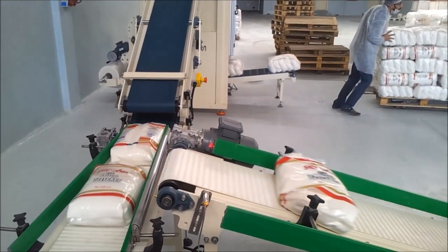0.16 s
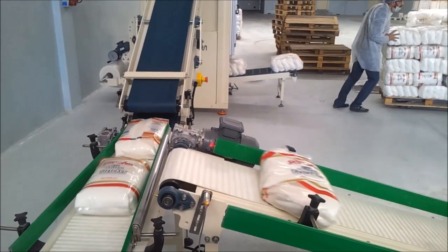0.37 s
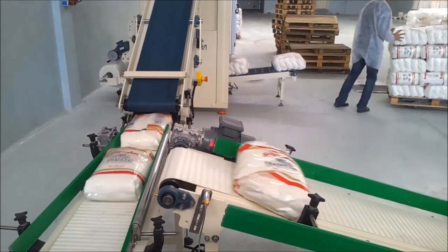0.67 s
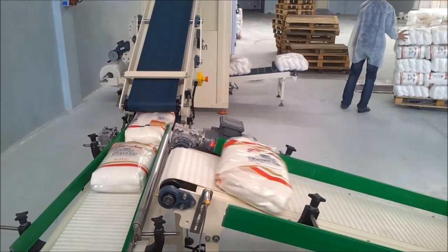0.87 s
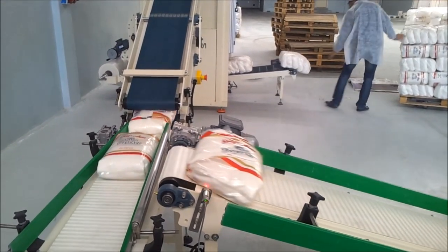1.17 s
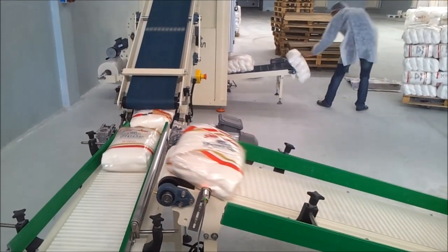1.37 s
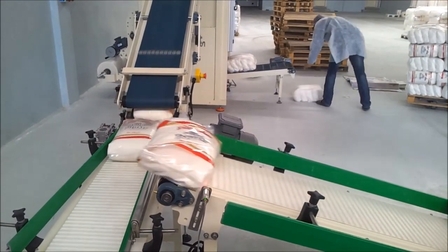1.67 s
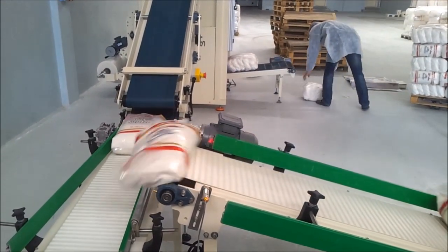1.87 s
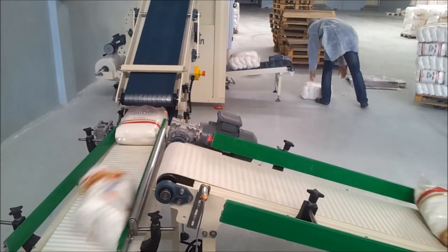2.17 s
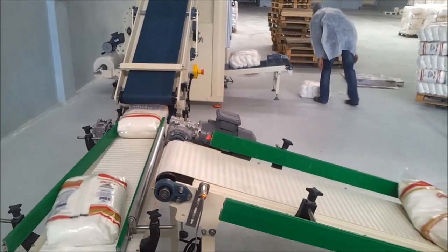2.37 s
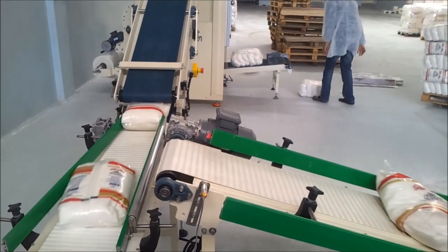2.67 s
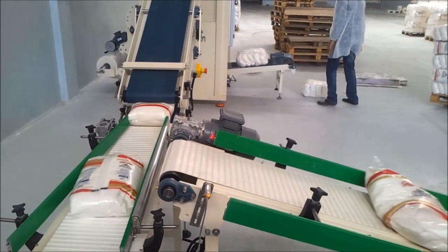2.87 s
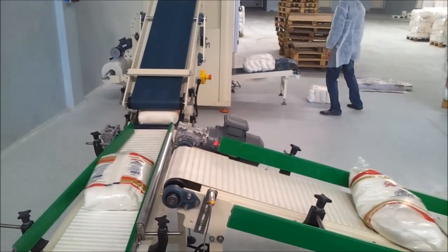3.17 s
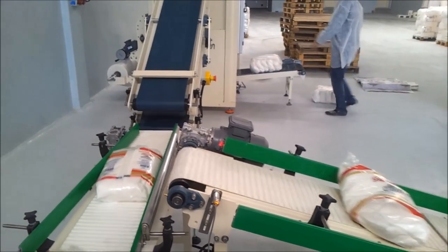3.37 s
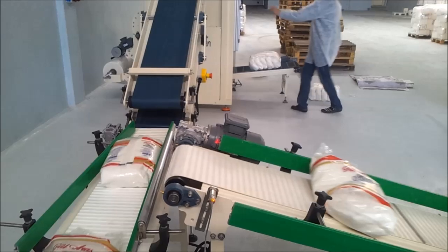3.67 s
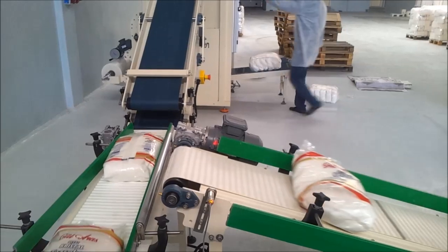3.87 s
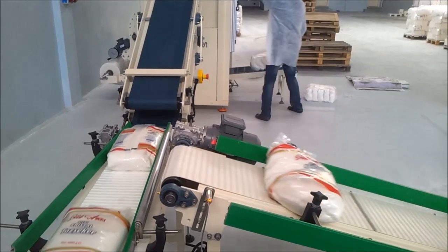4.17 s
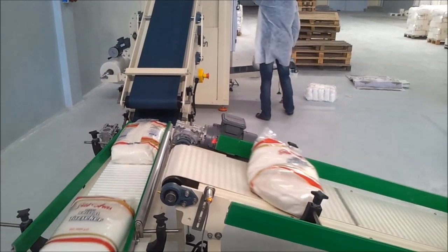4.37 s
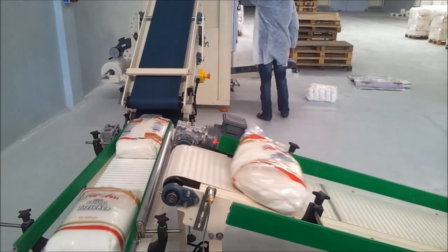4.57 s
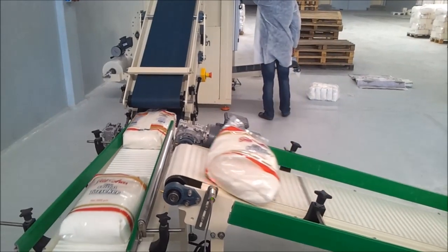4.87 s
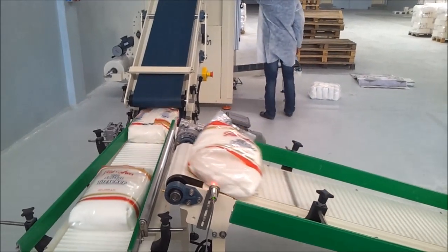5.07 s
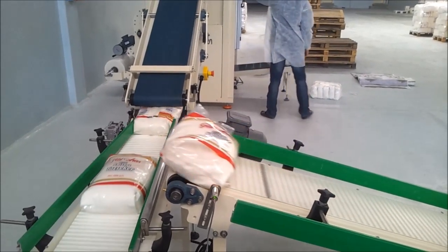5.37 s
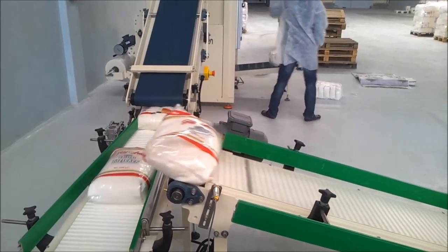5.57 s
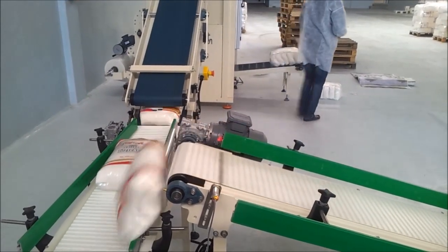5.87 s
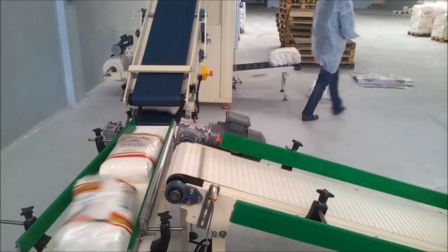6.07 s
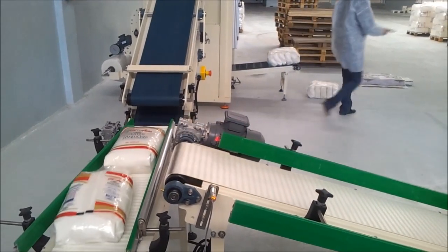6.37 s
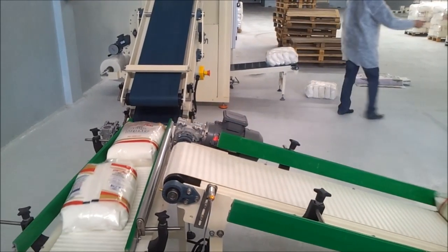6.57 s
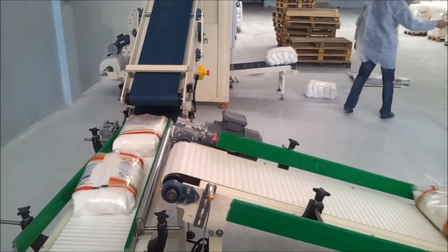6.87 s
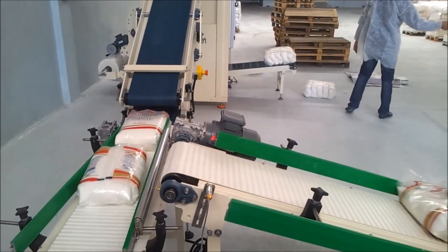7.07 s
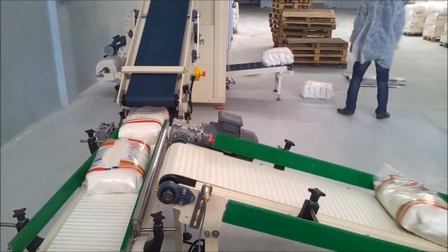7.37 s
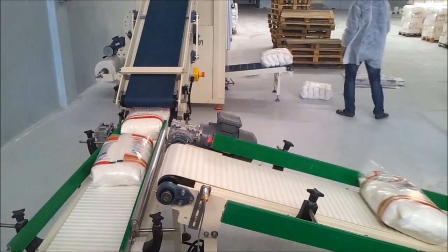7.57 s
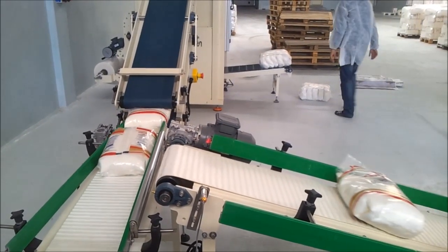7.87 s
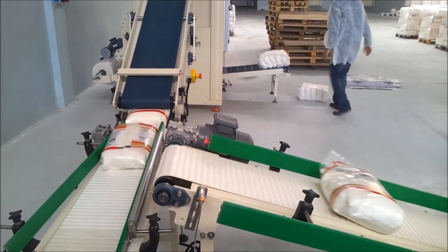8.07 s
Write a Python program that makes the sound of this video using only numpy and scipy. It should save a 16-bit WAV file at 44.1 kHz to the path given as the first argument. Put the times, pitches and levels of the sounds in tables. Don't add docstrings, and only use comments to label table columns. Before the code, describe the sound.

A bagging line runs in a large hall: low motor rumble, clattering belt links, faint wavering whine and a quick ten-per-second grainy rustle. A bag thumps early, short air jets hiss, a flap slams near two seconds, then knocks, strong valve puffs and long air jets follow. Another thump and a second slam come later. Stereo microphones stand close to the machinery, with short hall reverberation.

```python
import sys
import numpy as np
from scipy import signal
from scipy.fft import rfft, irfft, next_fast_len
from scipy.io import wavfile

SR = 44100
rng = np.random.default_rng(int(sys.argv[2]) if len(sys.argv) > 2 else 0)


def dump(signal):
    limited = np.clip(np.atleast_2d(signal).T, -1, 1)
    pcm = np.round(limited * 32767).astype(np.int16)
    wavfile.write(sys.argv[1], SR, pcm)


def linear_from_db(decibels):
    return 10 ** (np.asarray(decibels, float) / 20)


N = 362502
T = np.arange(N) / SR
HZ = np.maximum(np.fft.rfftfreq(next_fast_len(N), 1 / SR), 1)


def rms_one(x):
    return x / np.sqrt(np.mean(x ** 2) + 1e-20)


def in_time(rows):
    s, *columns = np.transpose(rows)
    return [np.interp(T, s, c) for c in columns]


def at_hz(points, hz):
    f, *columns = np.transpose(points)
    return [np.interp(np.log(hz), np.log(f), c) for c in columns]


def shaped(x, gain):
    size = next_fast_len(N)
    return irfft(rfft(x, size) * gain, size)[..., :N]


def drift(rate_hz):
    r = np.exp(-80 * np.pi * rate_hz / SR)
    slow = signal.lfilter([1], [1, -2 * r, r * r], rng.standard_normal(N // 40 + 2002))[2000:]
    return np.interp(np.arange(N) / 40, np.arange(len(slow)), rms_one(slow))


def resonate(x, hz, width_hz):
    r = np.exp(-np.pi * width_hz / SR)
    zeros = np.array([1, 0, -1]) * (1 - r * r) / 2
    return signal.lfilter(zeros, [1, -2 * r * np.cos(2 * np.pi * hz / SR), r * r], x)


def hiss(colour):
    return rms_one(shaped(rng.standard_normal((2, N)), linear_from_db(at_hz(colour, HZ)[0])))


def patchy(x, low_hz, flicker_db, rate_hz):
    out, together = 0, drift(rate_hz / 2)
    for centre_hz in low_hz * 2. ** np.arange(-1, 6):
        octave = np.cos(np.pi / 2 * np.clip(np.log2(HZ / centre_hz), -1, 1)) ** 2
        out = out + shaped(x, octave) * linear_from_db(flicker_db * (0.6 * together + drift(rate_hz)))
    return rms_one(out)


def burst(start_s, rise_s, t60_s, size=N):
    t = np.maximum(T[:size] - start_s, 0)
    return (1 - np.exp(-t / max(rise_s, 1e-4))) * linear_from_db(-60 * np.minimum(t / t60_s, 3))


def gate(start_s, length_s, attack_s, release_s):
    t = T - start_s
    opened = np.clip(np.minimum(t / attack_s, 1 - (t - length_s) / release_s), 0, 1)
    return opened, np.clip(t / length_s, 0, 1)


def swells(rows, rise_db_per_s, fall_db_per_s, rest_db):
    s, db = np.transpose(rows)[:, :, None]
    t = T[::100]
    below_db = np.maximum(rise_db_per_s * (s - t), fall_db_per_s * (t - s))
    return np.interp(T, t, np.maximum(np.max(db - below_db, axis=0), rest_db))


def taps(rows):
    out, t = np.zeros(N + SR), T[:SR // 4]
    for s, db, hz, t60_s in rows:
        out[round(s * SR):][:len(t)] += linear_from_db(db - 60 * t / t60_s) * np.sin(2 * np.pi * hz * t)
    return out[:N] * np.ones((2, 1))


def hall(x):
    t60_s, tail_db = 0.24, -13
    tail = rng.standard_normal((2, SR)) * burst(0.0032, 0.0079, t60_s, SR)
    tail = tail / np.sqrt(np.sum(tail ** 2, axis=1, keepdims=True))
    return x + linear_from_db(tail_db) * signal.fftconvolve(x * np.ones((2, 1)), tail, axes=1)[:, :N]


# pitch_hz, likeness [0-1], left_over_right_db
MIC_PAIR = [(60, 0.8, 11), (200, 0.87, 6), (497, 0.79, 3), (790, 0.53, 1.5), (1200, 0.3, 0.5),
            (1690, 0.16, 1), (2200, 0, -1), (3600, 0, -.5), (4960, 0, -5), (7960, 0, 5), (11200, 0, 5.5),
            (14500, 0, 11.5)]
# pitch_hz, lead_rad
LEFT_LEAD = [(60, 2.9), (300, 2.4), (700, 2.4), (1100, 1.4), (1700, -.3), (2500, -1.3), (4000, -3),
             (7000, -9.3), (10000, -16), (14500, -26)]


def pair(x, pan_db=0, direct=0):
    alike, balance_db = at_hz(MIC_PAIR, HZ)
    alike = np.clip(alike + direct, 0, 1)
    left = shaped(x[0], linear_from_db((balance_db + pan_db) / 2))
    right = shaped(x[0], alike * np.exp(-1j * at_hz(LEFT_LEAD, HZ)[0]))
    right = right + shaped(x[1], np.sqrt(1 - alike ** 2))
    return np.array([left, shaped(right, linear_from_db(-(balance_db + pan_db) / 2))])


# top_s, level_db
BASS_LUMPS = [(0, -36), (.14, -36), (.27, -31), (.68, -40), (.91, -38), (1.08, -45), (1.21, -42),
              (1.72, -38), (1.9, -34), (2.08, -35), (2.45, -41), (2.58, -39), (2.84, -34), (3.0, -40),
              (3.26, -35), (3.41, -43), (3.53, -41), (3.69, -42), (4.12, -50), (4.33, -44), (4.84, -41),
              (5.0, -40), (5.1, -43), (5.21, -40), (5.39, -31), (5.5, -46), (5.7, -49), (6.23, -42),
              (6.52, -45), (7.03, -31.5), (7.38, -41), (7.9, -52)]


def lumpy_bass():
    colour = [(20, -19), (50, -24), (85, -10.5), (140, 3.5), (190, -5.0), (260, -23.0)]
    level_db = swells(BASS_LUMPS, rise_db_per_s=170, fall_db_per_s=194, rest_db=-75)
    return linear_from_db(level_db + 1.0 + 0.52 * drift(16.0)) * hiss(colour)


# time_s, motors_db, links_db
DRIVE_LEVEL = [(0, -22.5, -21.5), (.45, -26.5, -19), (.98, -21, -20), (1.4, -26, -20), (1.75, -23, -19),
               (2.38, -24.5, -20), (2.7, -23, -19.5), (3.35, -24, -23), (3.6, -24.5, -19),
               (4.0, -26.5, -20.5), (4.4, -25, -19.5), (4.8, -27.5, -20.5), (5.2, -25, -21), (5.7, -23, -22),
               (6.2, -28, -21.5), (6.85, -24.5, -24), (7.8, -27.5, -24), (8.22, -25.5, -25)]
# pitch_hz, level_db [per Hz]
RUMBLE_COLOUR = [(100, -51), (170, -16.5), (302, -8), (353, -7), (457, -6.5), (541, -5.5), (656, -4),
                 (776, -7), (868, -14.5), (1910, -8), (2500, -18.5), (3250, -62), (5500, -120)]
# pitch_hz, width_hz, level_db
FRAME_MODES = [(244, 110, -18), (355, 49, -11), (550, 57, -4), (745, 65, -4.5)]
# pitch_hz, level_db [per Hz]
CLATTER_COLOUR = [(530, -20.5), (900, -8.5), (1520, -8), (1700, -5), (1870, -9.5), (2190, -10.5),
                  (2430, -11), (2670, -8), (5280, -16), (8290, -15), (11000, -18.5), (14300, -37),
                  (22000, -120)]
# pitch_hz, level_db [per Hz]
SIZZLE_COLOUR = [(6000, -35), (9000, -2), (11000, -2), (13000, 2), (15000, -10)]
# start_s, length_s, loss_db, change_db
SIZZLE_DIPS = [
    (1.15, .85, 7, -1),
    (2.3, .35, 8, 0),
    (3.2, .6, 12, -3),
    (6.3, 2, 5, 2),
]


def drives():
    rumble_db, clatter_db = in_time(DRIVE_LEVEL)
    sizzle_db = -25
    for s, length_s, loss_db, change_db in SIZZLE_DIPS:
        dipped, passed = gate(s, length_s, .1, 0.087)
        sizzle_db = sizzle_db - dipped * (loss_db + change_db * passed)

    white = rng.standard_normal((2, N))
    frame = 0
    for hz, width_hz, db in FRAME_MODES:
        frame = frame + linear_from_db(db) * rms_one(resonate(white, hz, width_hz)) * linear_from_db(1.9 * drift(5.2))
    rumble = patchy(hiss(RUMBLE_COLOUR), low_hz=162, flicker_db=1.5, rate_hz=16) + linear_from_db(-6) * frame

    links = rng.standard_normal((2, N)) * linear_from_db(2.0 * np.minimum(rng.exponential(1, N), 5))
    links = shaped(links, linear_from_db(at_hz(CLATTER_COLOUR, HZ)[0]))
    clatter = patchy(links, low_hz=606, flicker_db=0.7, rate_hz=6.9)
    sizzle = linear_from_db(sizzle_db - 8.5 + 2.5 * drift(13.0)) * hiss(SIZZLE_COLOUR)
    return linear_from_db(rumble_db + 4) * rumble + linear_from_db(clatter_db + 2.5) * clatter + sizzle


# time_s, centre_hz, level_db
BELT_RUB = [(0, 3470, -36), (1.5, 3460, -38), (1.65, 3510, -25), (2.1, 3580, -33), (2.45, 3400, -25),
            (2.75, 3480, -29), (3.2, 3530, -32), (3.7, 3490, -35), (4.6, 3400, -36), (4.75, 3450, -23),
            (5.0, 3430, -40), (6.0, 3490, -41), (6.3, 3490, -45), (7.1, 3400, -36), (7.3, 3360, -28),
            (7.65, 3400, -24), (7.85, 3370, -35), (8.22, 3550, -31)]


def rubbing():
    hz, level_db = in_time(BELT_RUB)
    lowpass = signal.butter(2, 210, fs=SR, output="sos")
    sway = signal.sosfilt(lowpass, rng.standard_normal((2, 2, N)))
    phase = 2 * np.pi * np.cumsum(hz + 60 * drift(7.9)) / SR
    band = rms_one(sway[0] * np.cos(phase) + sway[1] * np.sin(phase))
    return linear_from_db(level_db + 2.0 * drift(12)) * band


def glide(rows):
    hz, level_db = in_time(rows)
    tone = np.sin(2 * np.pi * np.cumsum(hz + 5.0 * drift(20)) / SR)
    return tone * linear_from_db(level_db + 1.5 * drift(15)) * (T < rows[-1][0])


SHAKER_FIRST_S, SHAKER_PERIOD_S = .045, .09688
# time_s, level_db
WHINE_LOAD = [(0, -30), (.55, -33), (.95, -31), (1.06, -28), (1.13, -27), (1.17, -22), (1.33, -24.5),
              (1.45, -33), (2.1, -31), (2.42, -28), (2.95, -31), (3.4, -26), (3.9, -34), (4.75, -38),
              (4.96, -27), (5.1, -25), (5.4, -24.5), (5.5, -33), (5.6, -25), (5.78, -24), (5.87, -31),
              (5.93, -33), (6.4, -39), (6.48, -28), (6.95, -32), (7.1, -50)]
# pitch_hz, width_hz, level_db
GEAR_BANDS = [(1755, 57, -5), (1650, 35, 3), (1890, 40, -14), (3400, 61, 2)]
# time_s, pitch_hz
MESH_PITCH = [(0, 1757), (.9, 1750), (1.05, 1722), (1.2, 1748), (1.32, 1765), (1.6, 1759), (4.9, 1755),
              (5.9, 1757), (6.5, 1760), (8.22, 1760)]
# time_s, pitch_hz, level_db
SLOWING_DRIVE = [(0, 985, -25), (.1, 990, -25), (.28, 980, -27), (.5, 1003, -25), (.7, 1003, -26),
                 (.8, 985, -28), (.88, 975, -50)]
# time_s, pitch_hz, level_db
COASTING_DRIVE = [(0, 955, -23), (.12, 945, -25), (.33, 930, -27), (.45, 930, -36), (.95, 925, -38),
                  (1.08, 940, -28), (1.3, 922, -27), (1.45, 912, -26), (1.55, 910, -50)]


def whine():
    white = rng.standard_normal(N)
    mesh = 0
    for hz, width_hz, db in GEAR_BANDS:
        mesh = mesh + linear_from_db(db) * rms_one(resonate(resonate(white, hz, width_hz), hz, width_hz))
    throb = np.cos(2 * np.pi * ((T - SHAKER_FIRST_S) / SHAKER_PERIOD_S - 0.05))
    tone_hz = in_time(MESH_PITCH)[0] + 4.0 * drift(9)
    tone = np.sin(2 * np.pi * np.cumsum(tone_hz) / SR)
    mesh = mesh + linear_from_db(9.0 + 3.5 * throb + 1.0 * drift(8)) * tone
    level_db = in_time(WHINE_LOAD)[0] - 10.5 + 1 * throb
    return linear_from_db(level_db) * mesh + glide(SLOWING_DRIVE) + glide(COASTING_DRIVE)


# time_s, level_db
SHAKER_STROKE = [(0, -26), (.6, -23), (1.2, -25.5), (1.7, -26), (2.1, -29), (2.67, -26), (2.78, -26),
                 (3.0, -25), (3.15, -22), (3.28, -20.5), (3.4, -28), (5.0, -26), (5.1, -20.5), (5.22, -24),
                 (5.4, -24), (5.7, -21.5), (8.22, -25)]
# pitch_hz, level_db [per Hz]
RUSTLE_COLOUR = [(2500, -11), (4000, 0.5), (5500, -9.5), (7000, 1.5), (8500, 2), (10000, 0.5),
                 (11500, -8.5), (14000, -26)]


def shaker():
    since_s = (T - SHAKER_FIRST_S) % SHAKER_PERIOD_S
    stroke = ((T - SHAKER_FIRST_S) // SHAKER_PERIOD_S + 1).astype(int)
    strength = linear_from_db(1.3 * rng.standard_normal(stroke.max() + 1))[stroke]
    throw = rms_one((1 - np.exp(-since_s / 0.0066)) ** 2 * np.exp(-since_s / 0.059))
    grains = linear_from_db(1.4 * np.minimum(rng.exponential(1, N), 5))
    rustle = rms_one(hiss(RUSTLE_COLOUR) * grains)
    return linear_from_db(in_time(SHAKER_STROKE)[0]) * strength * throw * rustle


# time_s, snaps_per_s
SNAP_RATE = [(0, 5), (1.9, 8), (2.1, 50), (2.3, 70), (2.6, 15), (5.7, 8), (6.0, 40), (6.3, 10), (8.22, 8)]


def crackle():
    snaps = rng.random(N) < in_time(SNAP_RATE)[0] / SR
    snaps = snaps * linear_from_db(-13 + 1.8 * rng.standard_normal(N))
    return 3.5 * (resonate(snaps, 3700, 2200) - 0.39 * resonate(snaps, 1900, 900)) * np.ones((2, 1))


def rattles(rows, width_share):
    out, size = np.zeros((2, N)), SR // 3
    white = rng.standard_normal((len(rows), 2, size))
    touch = linear_from_db(-7) * burst(0, .0002, .008, size)
    for rattle, (s, db, hz, t60_s) in zip(white, rows):
        i = round(s * SR)
        envelope = burst(0, 0.00034, t60_s, size) + touch
        sound = linear_from_db(db) * rms_one(resonate(rattle, hz, width_share * hz)) * envelope
        out[:, i:i + size] += sound[:, :N - i]
    return out


# start_s, level_db, pitch_hz, t60_s
HOLLOW_KNOCKS = [(.537, -18, 1400, 0.25), (.545, -17, 1840, 0.33), (.78, -18, 750, 0.22),
                 (1.525, -17, 1580, 0.35), (1.714, -15, 1750, .12), (1.52, -17, 1900, .2),
                 (1.525, -19, 2100, .15), (.537, -17, 1700, .2), (3.35, -17, 4000, .12),
                 (3.3, -17, 3400, .15), (1.714, -15, 1500, .1), (.572, -15, 1000, 0.11),
                 (.572, -18, 1480, .12), (.574, -19, 1900, 0.14), (.385, -18, 1700, .12),
                 (.905, -14, 1880, .1), (3.298, -13, 1450, .12), (3.305, -17, 1750, .1),
                 (3.335, -14, 3500, .14), (3.335, -16, 1350, .2), (3.405, -16, 1550, 0.22),
                 (3.51, -16, 1300, .12), (3.3, -22, 1700, .1), (3.675, -18, 1600, .08),
                 (2.749, -14, 687, .1), (4.883, -12.5, 930, 0.13), (4.884, -16, 1150, 0.25),
                 (5.699, -16, 680, .15), (6.17, -21, 3450, .15), (8.068, -13, 510, 0.17)]
# start_s, level_db, pitch_hz, t60_s
DRY_TICKS = [(1.625, -14, 1400, .18), (2.843, -15, 3500, 0.3), (2.064, -16, 4000, .12),
             (2.201, -16, 3240, .15), (2.29, -14, 4500, 0.035), (2.324, -21, 3800, .04),
             (2.931, -10, 550, 0.18), (2.934, -15, 3500, 0.13), (2.971, -12, 3200, .018),
             (3.0185, -13, 1910, 0.051), (3.43, -16, 1300, 0.11), (6.249, -10.5, 550, 0.15),
             (8.125, -14, 1100, 0.071), (8.16, -12, 2500, .1)]
# start_s, peak_db, pitch_hz, t60_s
HARD_TAPS = [(.097, -15, 1800, .02), (.186, -7, 1800, .02), (2.666, -15, 7500, .01),
             (2.9712, -11, 7990, .006), (2.9712, -11, 6000, .006), (3.0195, -13, 7500, .008),
             (3.0195, -13, 9500, .006), (1.8715, -10, 2300, .03), (2.0632, -12, 4000, .015),
             (2.2014, -11, 3900, 0.0088), (2.291, -9, 4600, .01), (2.3236, -17, 3000, .012),
             (2.799, -14, 1800, .03), (2.843, -13, 3000, .015), (2.931, -14, 1800, .03),
             (2.952, -16, 1700, .04), (2.9712, -12, 2050, .03), (2.9712, -10, 4000, .012),
             (2.980, -15, 1510, 0.022), (3.0182, -5, 1620, 0.016), (3.0182, -9, 2600, .012),
             (3.0195, -9, 4770, 0.011), (3.0215, -12, 3100, .02), (3.0235, -13, 2100, 0.031),
             (8.0700, -12, 550, .07), (8.083, -15, 620, 0.049), (8.083, -13, 3480, .03),
             (8.108, -15, 3600, .04), (8.1185, -10, 1790, 0.022), (8.1185, -9, 3000, .015),
             (8.1572, -14, 1800, .018), (8.159, -18, 4250, .015)]
# start_s, peak_db, pitch_hz, t60_s
GUARD_RINGS = [(.537, -16, 1301, .16), (.537, -18, 1120, .09), (.545, -16, 1935, .2),
               (.545, -16, 1750, .12), (.775, -14.5, 752, .2), (1.522, -16, 1607, .2),
               (1.525, -18, 1410, .16), (4.883, -23, 946, 0.12), (6.249, -20, 995, 0.11),
               (1.16, -19, 1570, .12), (5.41, -19, 1696, .12), (6.16, -21, 1870, .1),
               (6.21, -19, 1640, 0.13), (1.63, -29, 1430, .12)]


def contacts():
    return rattles(HOLLOW_KNOCKS, 0.2) + rattles(DRY_TICKS, 0.54) + taps(HARD_TAPS + GUARD_RINGS)


# start_s, peak_db, pitch_hz, length_s
BAG_THUMPS = [
    (0.251, 1.5, 357, 0.022),
    (5.38, 1, 355, 0.022),
    (5.431, -13, 350, .015),
]
# start_s, level_db, pitch_hz, length_s
INDEX_HUMS = [
    (0.02, -25, 236, .2),
    (.98, -21.5, 236, .2),
    (1.98, -22, 236, .22),
]


def thumps():
    out = np.zeros(N)
    for s, db, hz, length_s in BAG_THUMPS + INDEX_HUMS:
        t = T[:round(length_s * SR)]
        envelope = linear_from_db(db - 7 * t / length_s) * np.abs(np.sin(np.pi * t / length_s)) ** 0.14
        out[round(s * SR):][:len(t)] += envelope * np.sin(2 * np.pi * hz * t)
    return out


# start_s, level_db
FLAP_CLACKS = [
    (1.885, -1.5),
    (7.0234, -3),
    (2.1, -16),
    (7.7, -27),
]
# pitch_hz, level_db, t60_s, delay_s
FLAP_MODES = [(384, -1, 0.1, 0.0078), (714, -3.5, 0.14, 0.00045), (1020, 0.5, 0.071, .007),
              (1540, 0, 0.072, 0.0017), (1940, -3, 0.12, 0.013), (2250, -5.5, 0.052, 0.0029),
              (3200, 0, 0.12, 0.0022), (3600, -2, 0.077, 0), (4150, -1, 0.14, 0.00067),
              (4570, -1, 0.081, 0.0027), (7000, -18, 0.079, 0.0096), (9000, 0.5, 0.1, 0.0022),
              (11500, -13, .05, .002)]
# delay_s, peak_db, pitch_hz, t60_s
SLAM_BOUNCES = [(0, -2, 4540, .014), (.001, -12, 9500, .012), (.001, -9, 12400, .01),
                (.0015, -12, 7500, .012), (.001, -12, 3800, .015), (.0002, -12, 4930, .012),
                (.005, -4, 5000, 0.023), (.0075, -8, 714, 0.026), (.021, -7, 4400, .03),
                (.0005, -10, 3320, .012), (.006, -12, 3000, 0.014), (.010, -15, 2700, .015),
                (.016, -18, 3300, .015), (0, -1.5, 2300, 0.031), (.0035, -4, 2070, 0.023),
                (.005, -13, 4300, 0.011), (.008, -11, 820, 0.038), (.0095, -4, 1063, 0.028),
                (.013, -16, 3600, 0.011), (.017, -18, 720, .05), (.0195, -11.5, 2000, 0.027),
                (.025, -5, 730, .04), (.028, -11, 4030, .015), (.035, -11, 2080, .02)]


def clacks():
    out, size = np.zeros((2, N)), SR // 4
    white = rng.standard_normal((len(FLAP_CLACKS), 2, size))
    crack = 1.1 * burst(0, 0.00027, 0.019, size)
    for rattle, (s, db) in zip(white, FLAP_CLACKS):
        for k, (hz, mode_db, t60_s, delay_s) in enumerate(FLAP_MODES):
            blow = burst(delay_s, 0.00033, 0.78 * t60_s, size) + (delay_s < .001) * crack
            width_hz = 0.13 * hz
            own_rattle = np.roll(rattle, k * size // len(FLAP_MODES), axis=1)
            ring = resonate(own_rattle * blow, hz, width_hz) * np.sqrt(SR / np.pi / width_hz)
            out[:, round(s * SR):][:, :size] += linear_from_db(db + mode_db - 7.0) * ring
    bounces = []
    for s, db in FLAP_CLACKS[:2]:
        bounces += [(s + delay_s, db + tap_db, hz, t60_s) for delay_s, tap_db, hz, t60_s in SLAM_BOUNCES]
    return out + taps(bounces)


# start_s, level_db, rise_s, t60_s
VALVE_PUFFS = [
    (.545, -15, .015, 0.32),
    (3.53, -10, 0.0099, 0.43),
    (3.678, -5, 0.0092, 0.3),
    (5.675, -19, .01, .3),
]
# pitch_hz, level_db [per Hz]
SHORT_JET_COLOUR = [(880, -47), (1500, -19), (1720, -21), (2250, -3), (2480, -7), (3060, -8), (3470, -2.5),
                    (5560, -8.5), (9630, -7.5), (13900, -10.5), (15000, -21)]


def puffs():
    envelope = sum(linear_from_db(db) * burst(s, rise_s, t60_s) for s, db, rise_s, t60_s in VALVE_PUFFS)
    return envelope * hiss(SHORT_JET_COLOUR)


def jet(rows, colour, flutter_db, pan_db, direct=0, attack_s=0.034, release_s=0.035):
    gain = 0
    for s, length_s, db, change_db in rows:
        opened, passed = gate(s, length_s, attack_s, release_s)
        surge_db = 2 * np.exp(-passed * length_s / 0.15)
        gain = gain + opened * linear_from_db(db + change_db * passed + surge_db)
    return pair(gain * linear_from_db(flutter_db * drift(25)) * hiss(colour), pan_db, direct)


# start_s, length_s, level_db, change_db
BAG_SLIDE = [
    (3.2, 0.31, -10.5, -7.5),
]
# pitch_hz, level_db [per Hz]
BAG_SLIDE_COLOUR = [(290, -39), (500, -7), (571, -6.5), (1000, -9), (1510, -4), (1920, -12), (3130, -10),
                    (3800, -7.5), (4860, -17), (7000, -25), (9100, -53), (15400, -120)]


def slide():
    return jet(BAG_SLIDE, BAG_SLIDE_COLOUR, 0.71, pan_db=-0.5, attack_s=0.13, release_s=0.084)


# start_s, open_s, level_db, change_db
SHORT_NOZZLE = [
    (.175, 0.38, -21, 1.5),
    (1.15, 0.403, -19.5, 1.5),
    (2.16, .44, -20, 0),
]
FIRST_NOZZLE = [
    (3.8, 1.16, -15.5, -.3),
]
SECOND_NOZZLE = [
    (5.7, 2.5, -16, 1),
]
# pitch_hz, level_db [per Hz]
FIRST_NOZZLE_COLOUR = [(710, -44), (1200, -17), (1480, -4), (1770, -9), (2050, -2.5), (2240, 2.5),
                       (2450, -3.5), (3490, -2.5), (4590, -5), (6940, -11), (7600, -5.5), (8600, -4),
                       (9730, -10.5), (13900, -14.5), (15000, -23)]
SECOND_NOZZLE_COLOUR = [(880, -45), (1500, -7), (1730, -17), (2000, -15), (2400, -3.5), (2800, -6.5),
                        (3430, -0.5), (4200, -2.5), (6060, -7), (8500, -6), (9100, -2.5), (9800, -5.5),
                        (13900, -14.5), (14600, -24), (15000, -39)]


def air_jets():
    short = jet(SHORT_NOZZLE, SHORT_JET_COLOUR, 1.0, pan_db=-3.0, release_s=0.084)
    first = jet(FIRST_NOZZLE, FIRST_NOZZLE_COLOUR, 0.34, pan_db=0.5, direct=0.24)
    second = jet(SECOND_NOZZLE, SECOND_NOZZLE_COLOUR, 0.35, pan_db=-1.0, attack_s=0.088)
    return short + first + second


def scene():
    steady = pair(drives() + shaker() + puffs()) + pair(rubbing())
    notes = pair((thumps() + whine()) * np.ones((2, 1)), direct=1.0)
    blows = pair(contacts() + clacks() + crackle(), direct=0.13)
    air = air_jets() + slide()
    bass_filter = signal.butter(6, 175, "high", fs=SR, output="sos")
    above = signal.sosfilt(bass_filter, steady + air + notes + hall(blows))
    return above + pair(lumpy_bass(), pan_db=0.5, direct=-0.27)


def roll_off(x):
    return signal.sosfilt(signal.butter(12, 14800, fs=SR, output="sos"), x)


def record(dry):
    power = signal.lfilter([.003], [1, -.997], np.mean(dry ** 2, axis=0))
    level_db = 10 * np.log10(power + 1e-9)
    over_db = 0.24 * np.maximum(level_db + 8.5, 0)
    held_db = np.maximum.accumulate(over_db + 18.0 * T) - 18.0 * T
    x = dry * linear_from_db(-signal.lfilter([.002], [1, -.998], held_db))
    x = x / (1 + np.abs(x / .96) ** 8) ** (1 / 8)
    top_cut = signal.ellip(14, .5, 95, 14620, fs=SR, output="sos")
    return roll_off(signal.sosfilt(top_cut, x))


dry = scene()
out = record(dry)
dump(out)
```